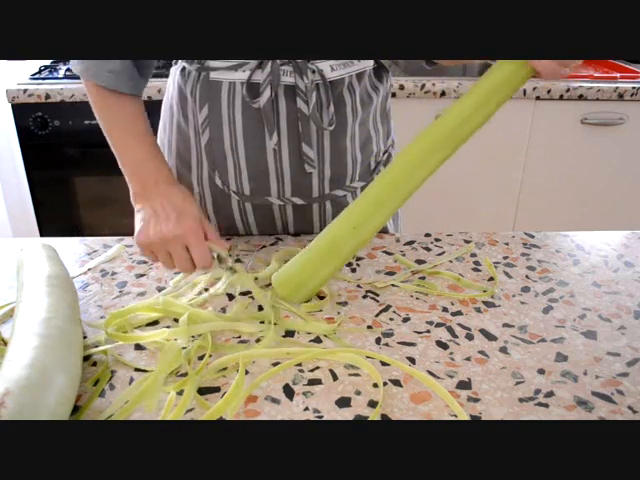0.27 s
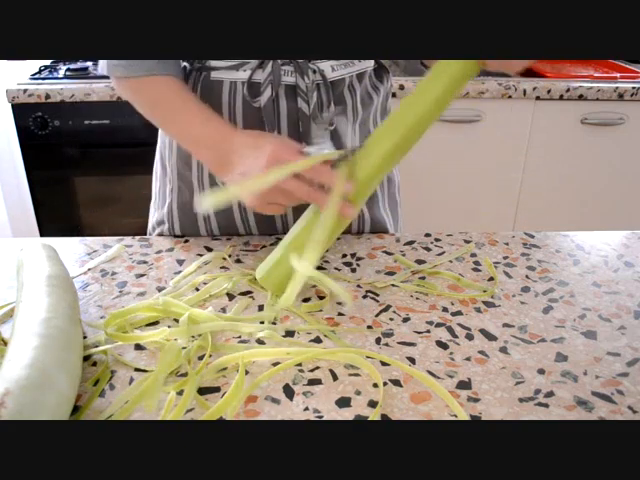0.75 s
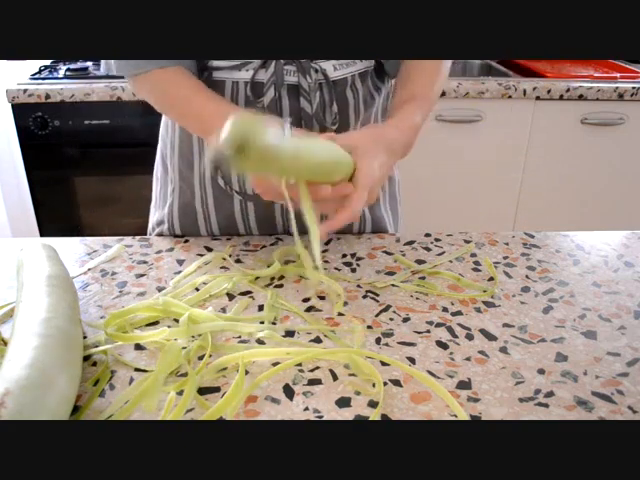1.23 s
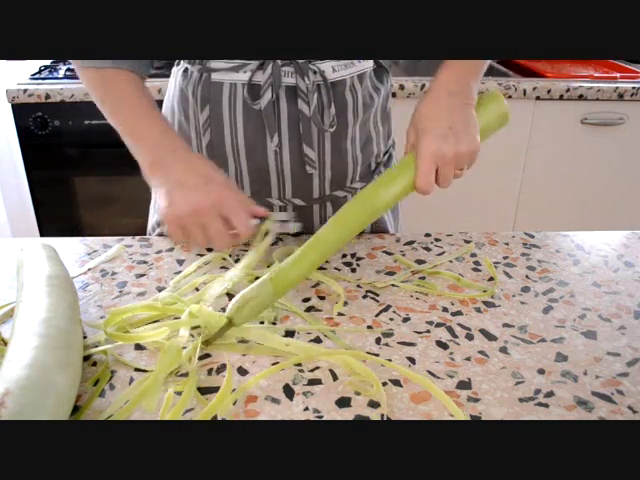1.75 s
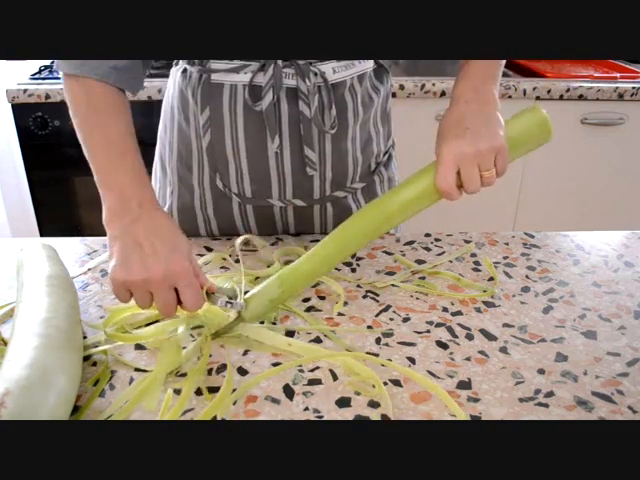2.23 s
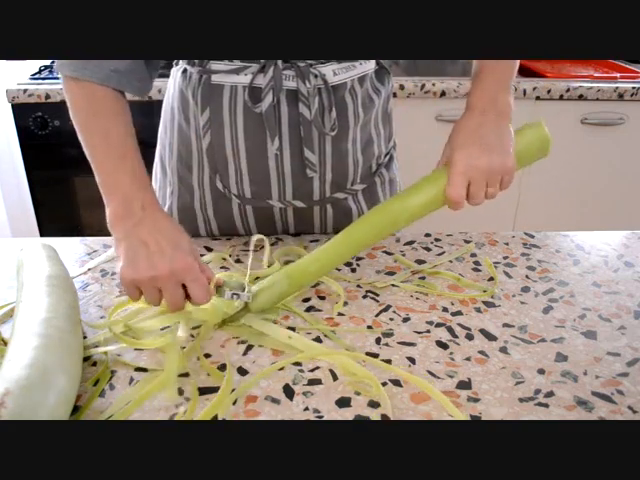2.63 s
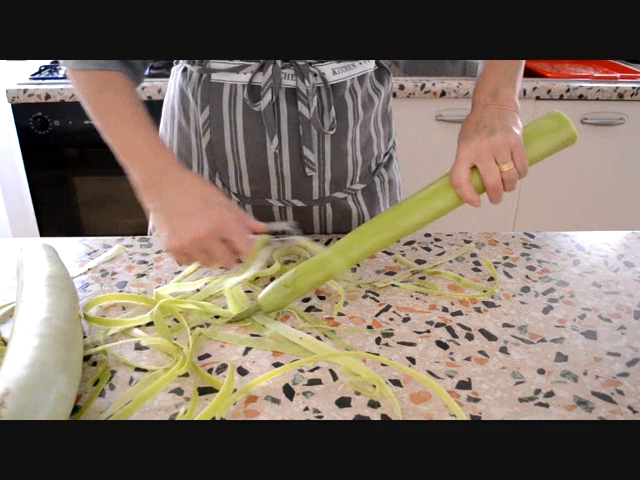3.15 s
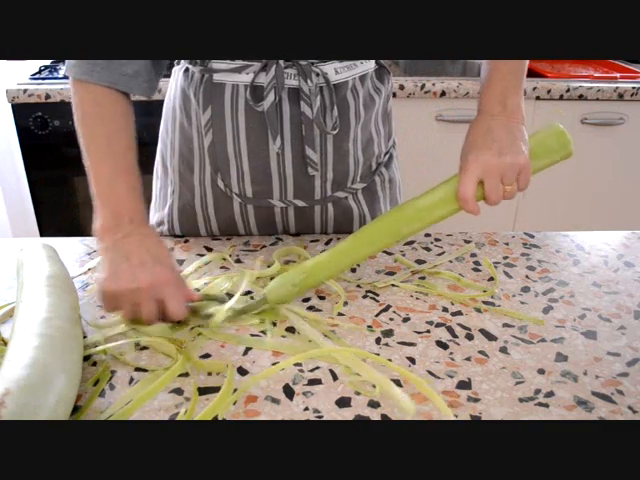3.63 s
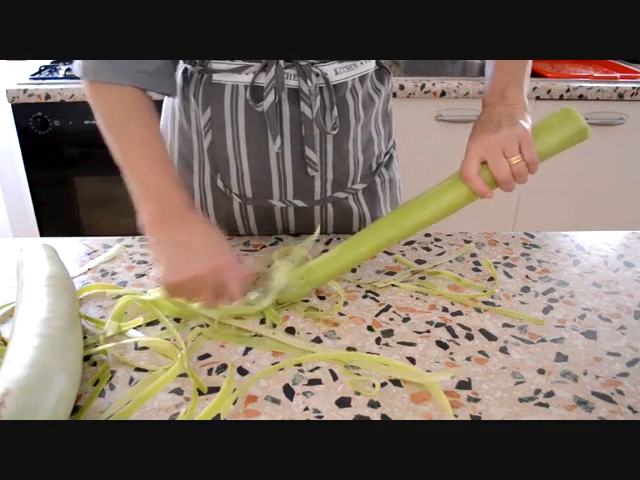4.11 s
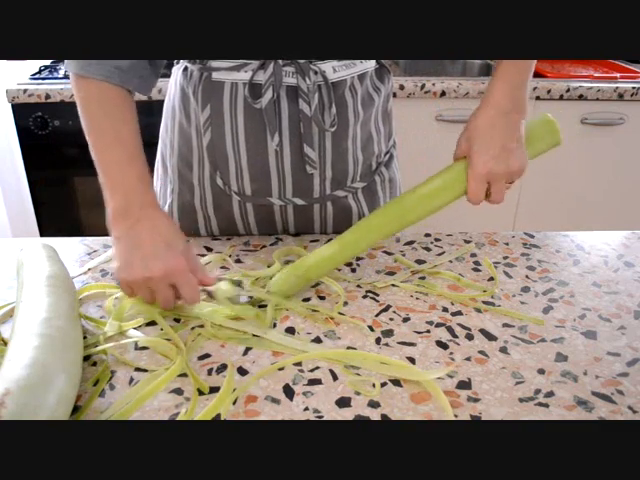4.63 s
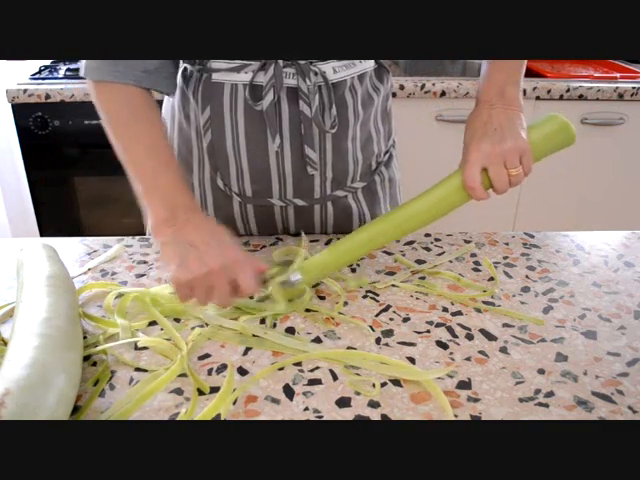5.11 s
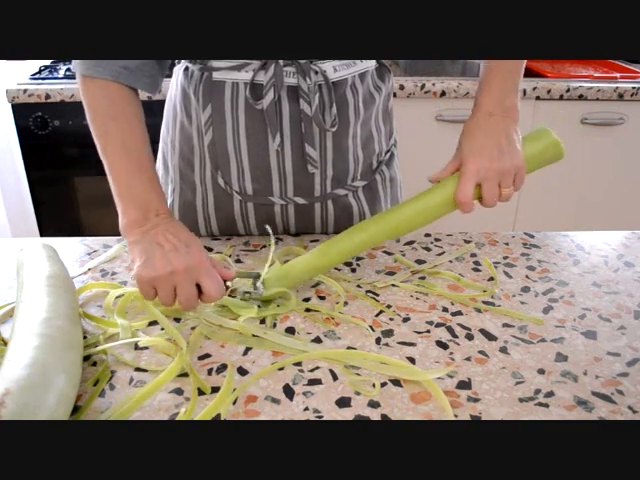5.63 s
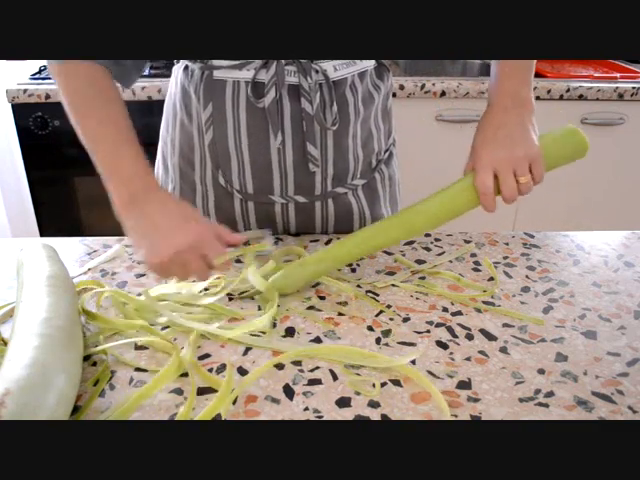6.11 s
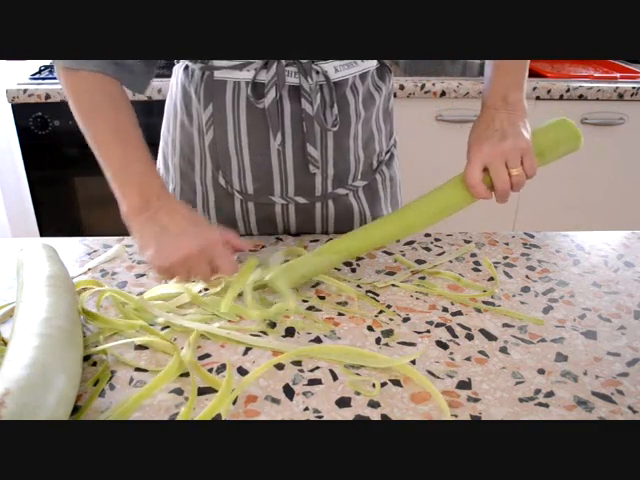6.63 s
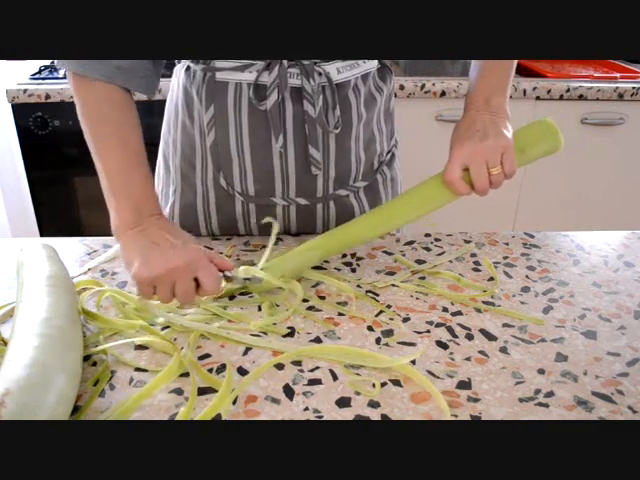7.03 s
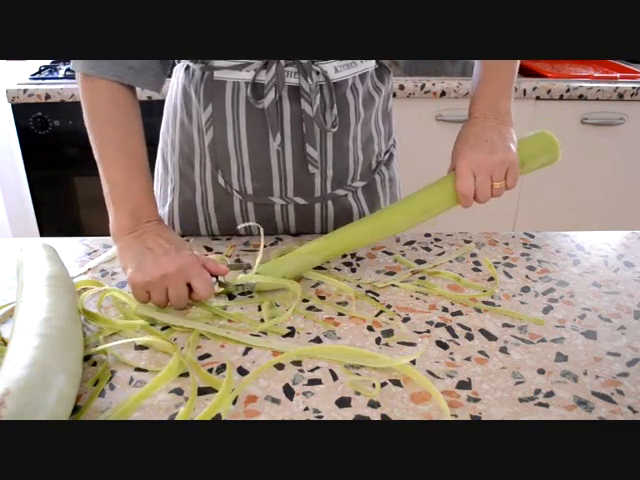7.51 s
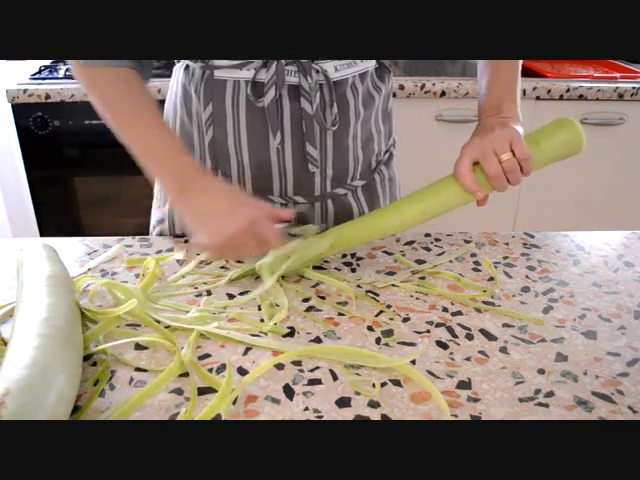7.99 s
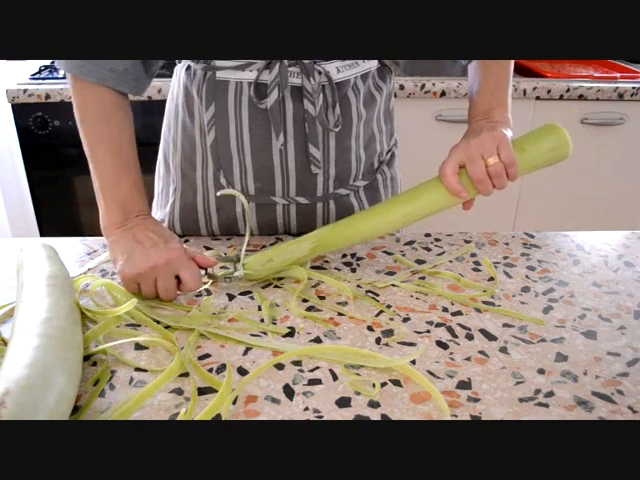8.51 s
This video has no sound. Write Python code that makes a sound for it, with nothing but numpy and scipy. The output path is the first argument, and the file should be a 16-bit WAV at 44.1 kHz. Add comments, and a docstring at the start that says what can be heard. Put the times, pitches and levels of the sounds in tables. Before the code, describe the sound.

Quick tearing peeler strokes strip wet vegetable skin, the metal blade clicking and rattling between them, after one loud knock on stone in a bare room.

```python
"""A swivel peeler strips a long gourd over a stone counter in a bare, echoing kitchen.
A soft hush, a hum and rustling peel run throughout, made of noise, a wavering tone and tiny ticks.
The loose blade jingles, then clicks as it lands, and a pull tears and chatters: snapping grains and a
wobbling tone. Squeaks and brief squeals are uneven tones; a hard knock on stone is a filtered burst.
More snaps, jingles and squeaks follow, with seven more long pulls, short cuts, softer knocks and a dull bump."""
import sys
import numpy as np
from scipy import signal
from scipy.fft import rfft, irfft
from scipy.io import wavfile

SR = 44100
rng = np.random.default_rng(int(sys.argv[2]) if len(sys.argv) > 2 else 0)


def master(y):
    """Save y as 16-bit WAV."""
    cut = np.clip(np.atleast_2d(y).T, -1, 1)
    pcm = np.round(cut * 32767)  # scale
    wavfile.write(sys.argv[1], SR, pcm.astype(np.int16))


N = 385875  # samples: 8.75 s


def amp(db):
    """Turns decibels into a plain multiplier."""
    return 10 ** (np.asarray(db) / 20)


def unit(x):
    """Scales to an rms of 1."""
    return x / np.sqrt(np.mean(x ** 2) + 1e-20)


def blow(x):
    """Scales a short sound to the energy of 10 ms at level 1."""
    return x * np.sqrt(SR / 100 / (np.sum(x ** 2) + 1e-20))


def read(points, hz):
    """Reads a table of (Hz, value) between its points, on a log-frequency axis."""
    point_hz, value = np.transpose(points)
    return np.interp(np.log(hz + 1), np.log(point_hz), value)


def add(mix, s, sound):
    """Mixes a sound in at time s."""
    part = mix[max(round(s * SR), 0):][:len(sound)]
    part += sound[:len(part)]


def colour(x, points, size=2048):
    """Filters with the given spectrum, without sounding early; white noise keeps its level."""
    hz = abs(np.fft.fftfreq(size, 1 / SR))
    log_gain = np.log(amp(read(points, hz)))
    # this choice of phase packs the response toward its start
    response = np.exp(np.conj(signal.hilbert(log_gain)))
    taps = np.fft.ifft(response).real
    return signal.oaconvolve(x, taps / np.linalg.norm(taps))[:len(x)]


def resonate(x, hz, width):
    """One resonance; its pitch and width are in Hz."""
    return signal.lfilter(*signal.iirpeak(hz, hz / width, fs=SR), x)


def wander(n, rate_hz):
    """Smooth chance: random values at the given rate, joined by straight lines."""
    steps = np.arange(n) * rate_hz / SR
    return np.interp(steps, np.arange(n), rng.standard_normal(n))


def grains(n, per_s, spread_db):
    """Random snaps, most small and a few large."""
    size = amp(spread_db * np.minimum(rng.exponential(1, n), 4))
    happens = rng.random(n) < per_s / SR
    return unit(size * rng.standard_normal(n) * happens)


# How long the echo lasts. Each row: frequency in Hz, time to fade by 60 dB in seconds.
ECHO_FADE = [(100, 0.77), (400, 0.8052), (1300, 0.7945), (3000, 0.6761), (5500, 0.67), (10000, 0.5)]
# How strong the echo is. Each row: frequency in Hz, echo over the direct sound in dB.
ECHO_LEVEL = [(100, 0), (1200, 5), (2200, 1), (4000, -3), (6000, -2.5), (10000, -4)]
# Standing waves between walls and cupboards. Each row: frequency in Hz, level over the echo around it in dB.
STANDING_WAVES = [(152, 7.5), (407, 12), (549, 9), (823, 4.5), (1119, 10), (1223, 10), (1378, 4.5),
                  (1514, 10.5)]


def kitchen(x, build_s=.018, first_s=.002, early=.55, mode_t60=.75):
    """Direct sound, then dense echoes that build up between the hard walls and die band by band."""
    taps = rng.standard_normal(SR) * (rng.random(SR) < .25)
    hz, t, bands = signal.stft(taps, SR, nperseg=256)
    t60 = read(ECHO_FADE, hz)[:, None]
    wet = amp(read(ECHO_LEVEL, hz))[:, None]
    fade = amp(-60 * t / t60) * np.clip(early + (t / build_s) ** 4, 0, 1)
    fade = fade / np.sqrt(np.sum(fade ** 2, 1, keepdims=True) * t[1])
    # direct sound and echo share the energy of each band
    echo_bands = bands * fade * wet / np.hypot(1, wet)
    tail = signal.istft(echo_bands, SR, nperseg=256)[1] / np.linalg.norm(taps)
    age = np.arange(len(tail)) / SR
    dying = amp(-60 * age / mode_t60)
    waves = sum(amp(db) * np.sin(2 * np.pi * mode_hz * age) for mode_hz, db in STANDING_WAVES)
    standing = waves * 2 * dying / dying.sum()
    direct_wet = amp(read(ECHO_LEVEL, np.fft.rfftfreq(len(x), 1 / SR)))
    heard = irfft(rfft(x) / np.hypot(1, direct_wet), len(x))
    add(heard, first_s, signal.fftconvolve(x, tail + standing))
    return heard


# Tone of the still kitchen's soft wash. Each row: frequency in Hz, relative level in dB.
HUSH_COLOUR = [(25, -38), (60, -16), (125, -11.5), (200, -9), (350, -5.5), (550, -3), (1000, -6.5),
               (2700, -10), (4500, -17), (7000, -27), (10500, -30.5)]
HUSH_DB = -57
# Hum of an appliance. The two values: pitch in Hz, level in dB.
APPLIANCE_HUM = (98, -75)


def still_air():
    """The quiet wash is coloured noise and the hum a slightly unsteady tone."""
    wash = amp(HUSH_DB + .7 * wander(N, rate_hz=6.7)) * colour(rng.standard_normal(N), HUSH_COLOUR)
    hum_hz, hum_db = APPLIANCE_HUM
    turns = np.cumsum(hum_hz * (1 + 0.0067 * wander(N, rate_hz=56))) / SR
    hum = unit(np.sin(2 * np.pi * turns))
    return wash + amp(hum_db + 2 * wander(N, rate_hz=9)) * hum


# Tone of the ticks in the peeler's frame and the peel. Each row: frequency in Hz, relative level in dB.
TICK_COLOUR = [(50, -27), (200, -19), (1000, -6.5), (1900, -3), (2400, -3), (3400, -2), (4800, -2),
               (6000, -4), (7200, -4.5), (8000, -10), (9300, -7.5), (11000, -10)]
# Hands turn the gourd and stir the wet peel.
# Each row: start in seconds, length in seconds, stirring added in dB (before the rustle's 3.5 dB cut).
HANDLINGS = [(0, 0.032, -47), (0.951, 0.13, -61), (1.207, 0.72, -65), (4.497, 0.27, -65),
             (7.9, 0.19, -57.5)]
RESTING_DB = -63.5  # the heap between handlings, before the same cut
SETTLE_S = .08  # how quickly it stirs and comes to rest
DROPS_PER_S, DROPS_DB = 14, -5  # scraps of peel tick now and then, dB over the fine ticks


def rustle():
    """Small wet ticks from the heap of peel, livelier while the hands move."""
    t = np.arange(N) / SR
    stir = amp(RESTING_DB)
    for s, length, db in HANDLINGS:
        corners = [s - SETTLE_S, s, s + length, s + length + SETTLE_S]
        stir = stir + amp(db) * np.interp(t, corners, [0, 1, 1, 0])
    ticks = grains(N, per_s=6000, spread_db=2)
    drops = unit(rng.uniform(-1, 1, N) * (rng.random(N) < DROPS_PER_S / SR))
    flicker = amp(-3.5 + 2.1 * wander(N, rate_hz=220))
    return stir * flicker * colour(ticks + amp(DROPS_DB) * drops, TICK_COLOUR)


# Tone of the rasp in a squeak. Each row: frequency in Hz, relative level in dB.
RASP_COLOUR = [(100, -21), (500, -7.5), (1300, -2.5), (2000, -2), (2600, -10.5), (3200, -25), (6000, -44.5)]
PEAK_SHARE, EDGE_DB = 0.37, -16.5  # a squeak peaks after this share of its length; dB at its ends
RASP_PER_SCATTER = 2.6  # rasp per unit of pitch scatter


def squeak(length, level_db, hz, scatter, overtone_db):
    """Uneven cycles, as in stick-slip: a tone that rasps more the more uneven they are."""
    t = np.arange(0, length, 1 / SR)
    n = len(t)
    phase = 2 * np.pi * np.cumsum(hz * (1 + scatter * wander(n, rate_hz=420))) / SR
    overtones = amp(-13.0) * np.sin(2 * phase) + amp(-20) * np.sin(3 * phase)
    rasp = colour(rng.standard_normal(n), RASP_COLOUR)
    voice = np.sin(phase) + amp(overtone_db) * (overtones + RASP_PER_SCATTER * scatter * rasp)
    flutter_db = 2.5 * wander(n, rate_hz=110)
    from_peak = np.interp(t / length, [0, PEAK_SHARE, 1], [1, 0, 1])
    arch_db = EDGE_DB * from_peak ** 1.4 + flutter_db
    return amp(level_db + arch_db) * unit(voice) * signal.windows.tukey(n, .1)


# Squeaks and groans of damp skin, with brief high blade squeals and a ringing note after a knock.
# Each row: start in seconds, length in seconds, level at the peak in dB,
# cycles a second in Hz, pitch scatter as a share, strength of overtones and rasp in dB.
SQUEAKS = [ (0.152, 0.015, -34, 3820, 0.045, -18), (0.240, 0.096, -39, 852, 0.11, -1),
           (0.268, 0.022, -28, 3950, .04, -29.5), (2.659, 0.21, -33, 881.7, 0.1335, -0.5),
           (2.760, 0.3, -42, 845, 0.054, 10), (4.271, 0.03, -43, 400, 0.14, -18),
           (5.319, 0.12, -33.5, 698, 0.22, -14.5), (5.320, 0.12, -41, 431.7, 0.11, -6.5),
           (5.981, 0.054, -29.5, 402, 0.18, -0.5), (6.686, 0.083, -35, 1142, .11, -14),
           (8.159, .23, -35, 874, 0.06, 3)]


def squeaks_and_squeals():
    """Squeaks and groans of damp skin, with brief high blade squeals and a ringing note after a knock."""
    squeaks = np.zeros(N)
    for s, *row in SQUEAKS:
        add(squeaks, s, squeak(*row))
    return squeaks


def burst(t, t60):
    """A dying jumble of contacts that holds every frequency about equally."""
    fade = amp(-60 * t / t60)
    x = rng.standard_normal(len(t)) * fade
    for _ in range(4):  # level the spectrum, then restore the fade
        spectrum = rfft(x)
        x = irfft(spectrum / (abs(spectrum) + 1e-12), len(t)) * np.sqrt(np.sqrt(fade))
    return x


# Tone of the crack of a blow. Each row: frequency in Hz, relative level in dB.
CRACK_COLOUR = [(30, -43), (110, -16), (165, -9.5), (500, -10), (850, 1.5), (1500, 1), (1900, -5),
                (2550, 3.5), (2950, 2.5), (3500, 5), (5300, 2), (7000, -2.5), (8000, -7), (9500, -4.5),
                (11000, -19)]


def knock(level_db, clack_hz, clack_db, thud_db, bright_hz, crack_t60=0.011):
    """A short crack, with a clack and a low thud from the same blow; a low top makes it a dull bump."""
    t = np.arange(SR // 6) / SR
    soften = signal.butter(2, bright_hz, fs=SR)  # a cushioned blow has less treble
    contact = signal.lfilter(*soften, burst(t, crack_t60))
    crack = colour(contact, CRACK_COLOUR)
    clack = resonate(crack, clack_hz, width=280)
    thud = resonate(crack, 200, width=340)
    return amp(level_db) * blow(crack + amp(clack_db) * clack + amp(thud_db) * thud)


# The peeler strikes the stone, or the gourd bumps on it. Each row: start in seconds, level in dB,
# pitch of the clack in Hz, gain of the clack in dB, gain of the thud in dB, top of the crack in Hz.
KNOCKS = [(0.3240, -0.5, 1438, -1, -14.5, 11300), (3.0954, -25.5, 1380, 2.5, -29, 4900),
          (3.7790, -18, 940, -3, -3.5, 8050), (5.985, -29, 400, -7, 6.5, 420),
          (6.052, -14.5, 1096, 1, -4, 7380), (6.6390, -16, 1150, 4, -11, 6440)]


def knocks_and_bumps():
    """The peeler strikes the stone, or the gourd bumps on it."""
    stone = np.zeros(N)
    for s, *row in KNOCKS:
        add(stone, s, knock(*row))
    return stone


# Ringing of the steel blade. Each row: pitch in Hz, level on a pressed blade in dB,
# time to fade by 60 dB in seconds.
BLADE_RING = [(2757, -13.5, 0.23), (3960, -11.5, 0.28), (5130, -5.5, 0.059), (6200, -7, .04),
              (7580, -7, 0.11), (9200, -4.5, .09), (9230, 0, .035), (9420, -1.5, .08), (9630, -8.5, .025),
              (10730, -7, 0.035)]


def rattle(blade_db, frame_db, length, free, free_db=11):
    """Tiny impacts ring the blade and tick in the frame; off the gourd its low modes ring louder."""
    t = np.arange(SR // 3) / SR
    cluster = np.exp(-(t / max(length, .001)) ** 2) * (1 - np.exp(-t / .0015))
    impacts = grains(len(t), per_s=16000, spread_db=3.0) * cluster
    nudges = grains(len(t), per_s=16000, spread_db=3.0) * cluster
    modes = np.zeros(len(t))
    for hz, db, t60 in BLADE_RING:
        lift_db = free_db * free * (hz < 4500)
        mode_hz = hz * (1 + .001 * rng.standard_normal())
        modes += amp(db + lift_db - 60 * t / t60) * np.sin(2 * np.pi * mode_hz * t)
    damped = modes * (1 + 6 * np.exp(-t / .0012))  # the ring starts several times stronger and falls back within a millisecond
    ring = signal.fftconvolve(nudges, damped)[:len(t)]
    return amp(blade_db) * blow(ring) + amp(frame_db) * blow(colour(impacts, TICK_COLOUR))


# The lifted blade swings in its pivots. Each row: start in seconds, level of the ring in dB,
# length in seconds.
JINGLES = [(0.002, -50.5, .006), (0.871, -47.5, 0.026), (0.964, -31.5, 0.035), (1.318, -39, 0.015),
           (1.343, -46, 0.013), (1.492, -38.5, 0.029), (1.59, -37.5, 0.012), (4.821, -44, 0.015)]
JINGLE_TICK_DB = -2.5  # tick over the ring


def blade_jingles():
    """The free blade rattles in its pivots."""
    blade = np.zeros(N)
    for s, level_db, length in JINGLES:
        add(blade, s, rattle(level_db, level_db + JINGLE_TICK_DB, length, free=True))
    return blade


CLICK_S = .0065  # length of a click's cluster of impacts
PRESSED_RING_DB, LIFTED_RING_DB = -1.5, -13.5  # steel ring over the tick, on the gourd or lifted off it


def click(s, level_db):
    """One snap of the blade; pressed on the gourd, the steel takes more of the blow."""
    pressed = any(start - .02 < s < start + length for start, length, *_ in STROKES + NICKS)
    ring_db = PRESSED_RING_DB if pressed else LIFTED_RING_DB
    return rattle(level_db + ring_db, level_db, CLICK_S, free=not pressed)


# The blade snaps against its stop. Each row: start in seconds, level of the tick in dB.
CLICKS = [(0.151, -40.5), (0.274, -34), (0.692, -40.5), (1.018, -33.5), (1.215, -47), (1.391, -40.5),
          (1.523, -39), (1.914, -45), (3.047, -32.5), (3.066, -29), (3.778, -28.5), (4.356, -35),
          (4.637, -42), (5.991, -36.5), (6.005, -32), (6.625, -30.5), (7.850, -32.5), (7.947, -41.5),
          (8.709, -54)]


def blade_clicks():
    """Single snaps of the loose blade."""
    blade = np.zeros(N)
    for s, level_db in CLICKS:
        add(blade, s, click(s, level_db))
    return blade


# Tone of the tearing skin. Each row: frequency in Hz, relative level in dB.
TEAR_COLOUR = [(60, -29), (300, -14.5), (900, -9.5), (1500, -4.5), (2200, -0.5), (2700, -3), (3600, 0.5),
               (4600, -8.5), (5600, -14), (7200, -10.5), (8000, -16), (9300, -11), (11000, -20.5)]
# Tone of the rumbling gourd. Each row: frequency in Hz, relative level in dB.
BODY_COLOUR = [(30, -33), (90, -19), (150, -1), (220, -5.5), (410, 0), (520, -5.5), (750, 1.5), (1200, -6),
               (2000, -23), (5000, -22.5)]
CHATTER_HZ = 3287


def stroke(length, hardest_share, first_db, top_db, chatter_db, body_db, chatter_scatter=.095):
    """Fibres snap under the blade as it gathers speed; the blade chatters and the gourd rumbles."""
    t = np.arange(0, length + 0.033, 1 / SR)
    n = len(t)
    hardest = hardest_share * length
    speed = np.clip(t / max(hardest, .005), 0, 1) ** 4.5
    easing = np.clip((t - hardest) / max(length - hardest, .005), 0, None) ** 2
    force_db = first_db + (top_db - first_db) * speed - 11 * easing
    force = amp(force_db + 1.3 * wander(n, rate_hz=190))
    tear = colour(grains(n, per_s=12000, spread_db=1.9), TEAR_COLOUR)
    cycles = np.cumsum(CHATTER_HZ * (1 + chatter_scatter * wander(n, rate_hz=1100))) / SR
    wobble = unit(np.sin(2 * np.pi * cycles) * amp(1.4 * wander(n, rate_hz=600)))
    chatter = wobble * (.5 + .5 * speed)  # grows with speed
    body = colour(grains(n, per_s=1000, spread_db=3), BODY_COLOUR)
    layers = tear + amp(chatter_db) * chatter + amp(body_db) * body
    return force * layers * signal.windows.tukey(n, .04)


# Short cuts that free a strip, hard from the start. Each row: start in seconds, length in seconds,
# tearing level in dB, full chatter over the tearing in dB, gourd body over the tearing in dB.
NICKS = [(1.752, 0.053, -48.5, -19, 0.5), (3.041, 0.082, -43.5, -13, 2.5), (3.768, 0.048, -29.5, -10, -2.5),
         (5.977, 0.12, -38, 1, 1), (7.500, 0.065, -47, 3, 3), (7.823, 0.11, -45, -5, -18),
         (8.708, 0.028, -41.5, -4, -5.5)]
NICK_SHARE = 0.23  # a short cut holds its force for this share of its length


def short_cuts():
    """Each cut tears at full force at once and then eases off."""
    blade = np.zeros(N)
    for s, length, level_db, chatter_db, body_db in NICKS:
        add(blade, s, stroke(length, NICK_SHARE, level_db, level_db, chatter_db, body_db))
    return blade


# Long pulls of the blade down the gourd. Each row: landing in seconds, length in seconds,
# landing click in dB, hardest tearing in dB, full chatter over the tearing in dB,
# gourd body over the tearing in dB.
STROKES = [ (0.137, 0.16, -45, -40.5, 1.5, -8.5), (2.104, 0.27, -38, -35, -8.5, -21),
           (3.443, .16, -30, -31.5, 0, -13), (4.169, 0.23, -29.5, -32, -7, -7),
           (5.199, 0.2, -37, -36, -4.5, -9), (6.497, 0.19, -35, -27.5, 2.5, -8.5),
           (6.967, .18, -33, -35, 3.5, -10.5), (8.277, 0.2, -32.5, -33, 6.5, -15.5)]
BITE_DB, HARDEST_SHARE = -46, 0.64  # loudest first bite; the pull is hardest after this share of its length
TOUCH_S, TOUCH_DB = .005, -12.5  # light touch this long before the landing click, dB over that click


def long_pulls():
    """The blade touches lightly, swivels flat with a click, bites gently and tears harder."""
    blade = np.zeros(N)
    for s, length, landing_db, top_db, chatter_db, body_db in STROKES:
        add(blade, s - TOUCH_S, click(s, landing_db + TOUCH_DB))
        add(blade, s, click(s, landing_db))
        first_db = min(BITE_DB, top_db - 13.5)  # a light pull also bites lightly
        add(blade, s, stroke(length, HARDEST_SHARE, first_db, top_db, chatter_db, body_db))
    return blade


def scene():
    """Blade and peel, knocks, and squeaks each sound into the kitchen with echoes of their own."""
    blade = blade_jingles() + blade_clicks() + short_cuts() + long_pulls()
    echoing = kitchen(blade + rustle()) + kitchen(knocks_and_bumps()) + kitchen(squeaks_and_squeals())
    return (still_air() + echoing)[None]


EDGE_HZ = 11000  # upper band limit


def record(dry):
    """The hardest knock overloads the small microphone, which sheds the deep bass; then the band limit."""
    clipped = np.clip(dry, -1, 1)
    thin = signal.sosfilt(signal.butter(2, 55, "high", fs=SR, output="sos"), clipped)
    band_limit = signal.firwin(255, EDGE_HZ, window=("kaiser", 8), fs=SR)
    return signal.oaconvolve(thin, band_limit[None], "same")


dry = scene()
out = record(dry)
master(out)
```